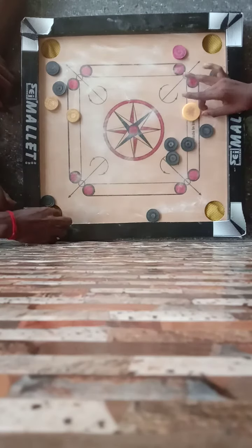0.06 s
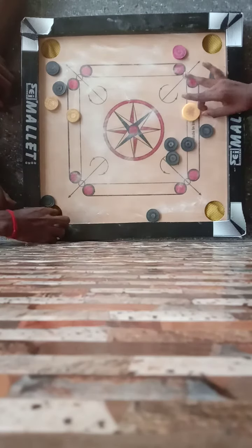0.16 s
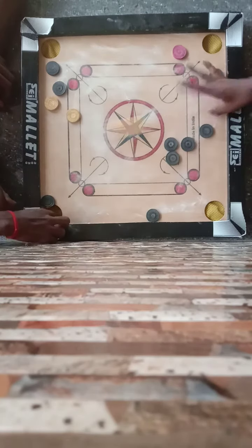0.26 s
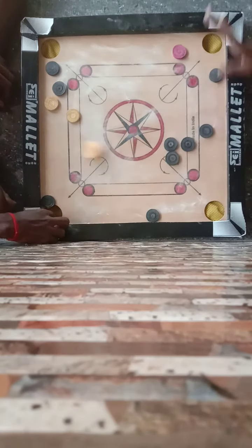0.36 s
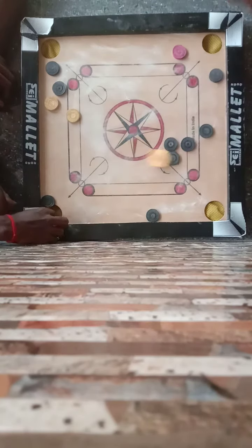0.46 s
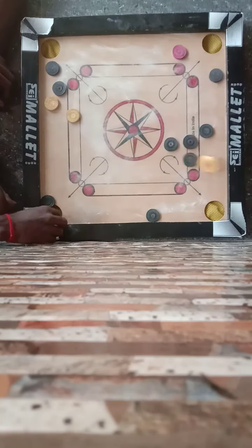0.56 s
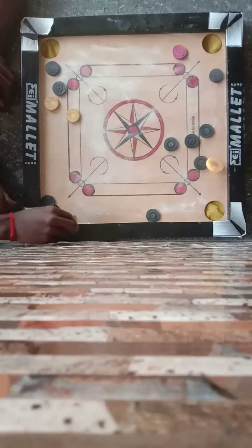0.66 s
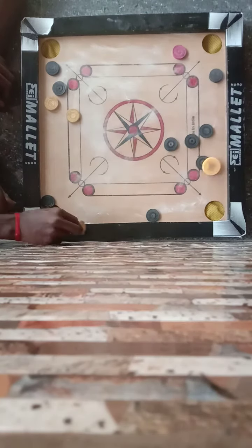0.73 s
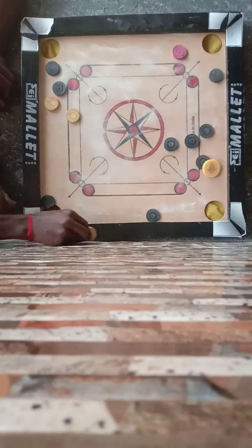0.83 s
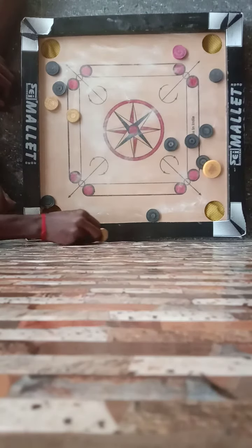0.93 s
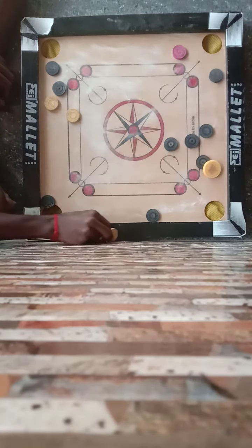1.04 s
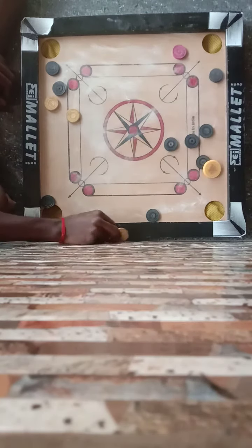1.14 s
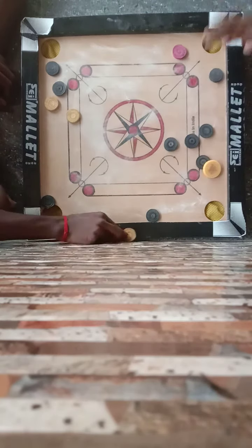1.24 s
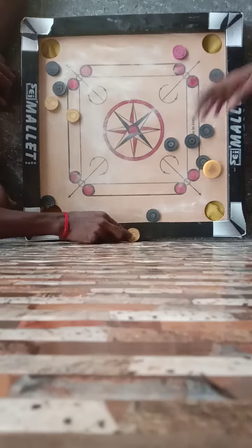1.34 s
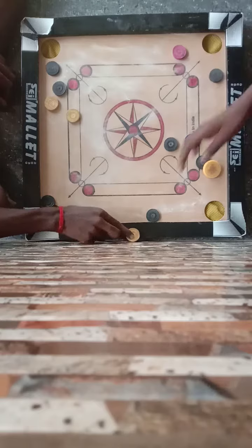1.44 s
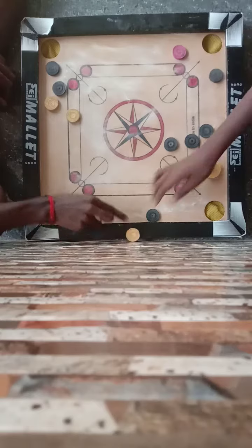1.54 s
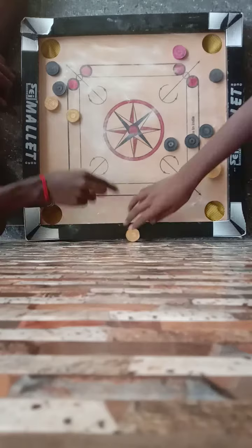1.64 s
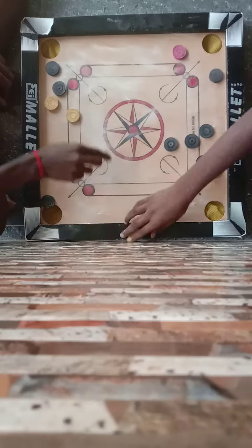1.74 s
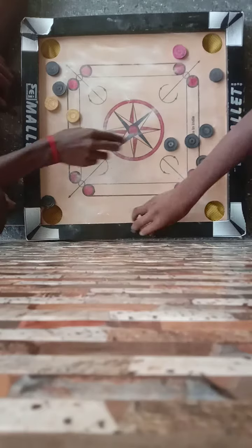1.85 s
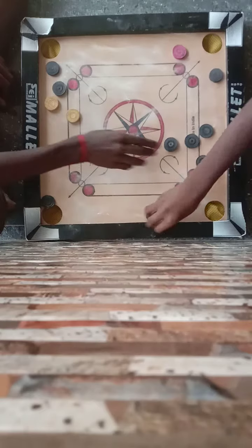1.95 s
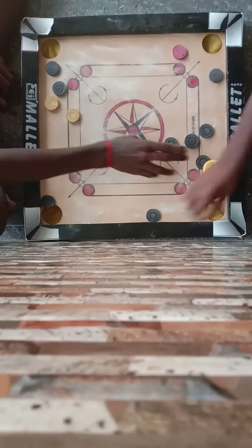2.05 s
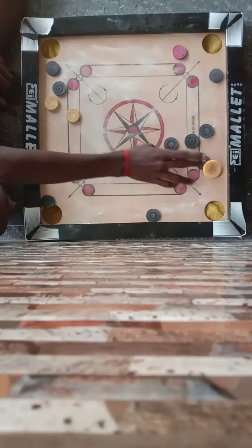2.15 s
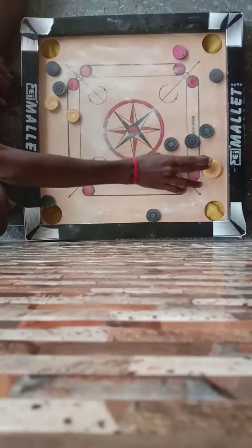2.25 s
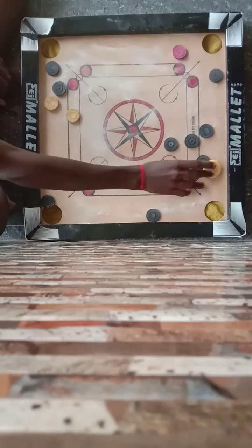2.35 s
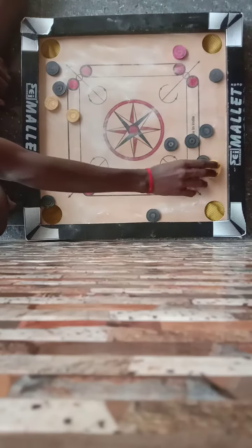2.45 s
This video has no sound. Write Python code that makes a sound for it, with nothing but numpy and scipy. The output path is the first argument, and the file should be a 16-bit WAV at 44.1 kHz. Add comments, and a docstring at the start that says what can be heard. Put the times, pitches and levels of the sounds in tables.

```python
"""A small hard room with a carrom board, heard by a phone, almost in mono. A striker and wooden discs clack
against each other and the frame: filtered noise for the contact, resonances for the dull ring of the thin board.
A wall answers 8 ms later and decaying noise stands for the diffuse room.
Soft low thumps are short decaying sines, and a hand brushing the board is grainy coloured noise.
Beneath lie a steady noise hush with a thin two-tone whine and an unsteady low rumble."""
import sys
import numpy as np
from scipy import signal
from scipy.fft import rfft, irfft, next_fast_len
from scipy.io import wavfile
from scipy.ndimage import uniform_filter1d

SR = 44100
rng = np.random.default_rng(int(sys.argv[2]) if len(sys.argv) > 2 else 0)


def wrap_up_sound(samples):
    """Save the sound to the file named by the first command line argument, as 16-bit audio."""
    columns = np.atleast_2d(samples).T
    # keep every value between -1 and 1, then stretch to whole-number steps
    tamed = np.clip(columns, -1, 1)
    steps = np.round(tamed * 32767).astype(np.int16)
    wavfile.write(sys.argv[1], SR, steps)


N = 110250  # samples, 2.5 s


def amp(db):
    """The decibel law: a level in dB as an amplitude gain."""
    return 10 ** (np.asarray(db) / 20)


def unit(x):
    """Power normalisation: x scaled to rms 1."""
    return x / np.sqrt(np.mean(x ** 2) + 1e-20)


def along(points, hz):
    """Interpolation on a logarithmic frequency axis through (Hz, value) points."""
    f, v = np.transpose(points)
    return np.interp(np.log(hz + 1), np.log(f + 1), v)


def curve(rows):
    """Linear interpolation in time through (s, value) rows, one value per sample."""
    s, v = np.transpose(rows)
    return np.interp(np.arange(N) / SR, s, v)


def filtered(x, response):
    """Linear filtering: the spectrum of x times a response that is a function of frequency."""
    m = next_fast_len(N + SR // 2)
    hz = np.fft.rfftfreq(m, 1 / SR)
    return irfft(rfft(x, m) * response(hz), m)[..., :N]


def rush(spectrum, patchy_db):
    """Turbulent-like noise of rms 1: random gain patches in time and frequency, then a spectral colour."""
    z = signal.stft(rng.standard_normal(N), nperseg=512)[2]
    across_bands = uniform_filter1d(rng.standard_normal(z.shape), size=5, axis=0)
    patches = unit(uniform_filter1d(across_bands, size=8, axis=1))
    x = signal.istft(z * amp(patchy_db * patches), nperseg=512)[1][:N]
    return unit(filtered(x, lambda hz: amp(along(spectrum, hz))))


# Level of the low rumble. Each row: time in seconds, rms level in dB.
RUMBLE_LEVEL = [(.01, -47), (.15, -54.5), (.3, -46), (.9, -45.5), (1.04, -44.5), (1.1, -51.5), (1.75, -50),
                (2.1, -50.5), (2.3, -47), (2.5, -52)]
# Colour of the low rumble. Each row: frequency in Hz, relative level in dB.
RUMBLE_COLOUR = [(25, -37), (135, -8), (167, -1), (296, -7), (328, -0.5), (380, -32), (840, -120)]


def rumble():
    """Amplitude modulation of low-frequency noise: the rumble comes and goes."""
    return amp(curve(RUMBLE_LEVEL)) * rush(RUMBLE_COLOUR, patchy_db=5.0)


# Colour of the steady room noise. Each row: frequency in Hz, relative level in dB.
HUSH_COLOUR = [(220, -62), (380, 1.5), (496, -9), (572, 3.5), (713, -0.5), (1250, 2.5), (1690, -9.5),
               (2180, -15), (3400, -21), (4220, -16.5), (6550, -27), (7550, -13), (9260, -39.5),
               (13800, -47), (14800, -35), (15450, -41), (15600, -72)]
# Tones of a faint electric whine. Each entry: frequency in Hz.
WHINE_HZ = [14919, 15119]
HUSH_DB, WHINE_DB = -48.5, -88  # rms of the noise; peak of each tone


def hush():
    """Superposition of stationary coloured noise, steady pure tones and the rumble."""
    t = np.arange(N) / SR
    whine = sum(np.sin(2 * np.pi * hz * t) for hz in WHINE_HZ)
    noise = rush(HUSH_COLOUR, patchy_db=0.8)
    return amp(HUSH_DB) * noise + amp(WHINE_DB) * whine + rumble()


# Level of the sliding hand. Each row: time in seconds, rms level in dB.
SLIDE_LEVEL = [(1.78, -74), (1.84, -59), (1.92, -50), (2.03, -50.5), (2.065, -43.5), (2.1, -53.5),
               (2.125, -47), (2.15, -51.5), (2.18, -47), (2.22, -56.5), (2.35, -66)]
# Colour of the sliding hand. Each row: frequency in Hz, relative level in dB.
SKIN_COLOUR = [(1060, -14), (1800, 1), (2290, -1.5), (7450, 3), (10800, -19.5), (11800, -28), (14000, -27),
               (15100, -14), (15700, -55)]
# Rustles on their own. Each row: time of the crest in seconds, level in dB.
RUSTLES = [(1.69, -62), (2.33, -60.5)]
SLIDE_PATCHY_DB = 3.2
GRAIN_DB, GRAINS_PER_S = 1.8, 250
RUSTLE_HZ, RUSTLE_WIDTH_HZ, RUSTLE_S = 4230, 800, 0.028  # widths: from the crest to 1/e


def brush():
    """Sliding friction: a hand on the powdered board gives fine random grains, and rustles twice on its own."""
    t = np.arange(N) / SR
    grain_db = GRAIN_DB * np.interp(t * GRAINS_PER_S, np.arange(N), rng.standard_normal(N))
    slide = unit(amp(grain_db) * rush(SKIN_COLOUR, SLIDE_PATCHY_DB))
    rustle = filtered(rng.standard_normal(N), lambda hz: np.exp(-((hz - RUSTLE_HZ) / RUSTLE_WIDTH_HZ) ** 2))
    swells = sum(amp(db) * np.exp(-((t - s) / RUSTLE_S) ** 2) for s, db in RUSTLES)
    return amp(curve(SLIDE_LEVEL)) * slide + swells * unit(rustle)


# Soft bumps. Each row: start in seconds, envelope peak in dB, pitch in Hz, time to fall 60 dB in seconds.
THUMPS = [(0.932, -41, 82, 0.045), (1.106, -45.5, 88, 0.075), (1.383, -24.5, 99.5, 0.05),
          (1.445, -34, 79, 0.087), (1.55, -29, 154, 0.046), (1.57, -33, 101, 0.072),
          (1.655, -29, 74.5, 0.045), (1.702, -36.5, 112, 0.066), (1.76, -23, 101.6, 0.074),
          (1.801, -31.5, 83, 0.058), (1.907, -40, 86.4, 0.1), (1.987, -41.5, 59.6, 0.26),
          (2.062, -34, 106, 0.067), (2.129, -41.5, 82, 0.097), (2.204, -41.5, 66.6, 0.08)]
THUMP_RISE_S = 0.0018


def thumps():
    """Heavily damped oscillation: each soft bump is a low sine lasting a few cycles."""
    out, t = np.zeros(N + SR), np.arange(SR // 4) / SR
    for start_s, db, hz, length_s in THUMPS:
        rise = (1 - np.exp(-t / THUMP_RISE_S)) ** 2
        shape = amp(-60 * (t / length_s) ** 2) * rise
        bump = amp(db) * shape / shape.max() * np.sin(2 * np.pi * hz * t)
        out[round(start_s * SR):][:len(t)] -= bump
    return out[:N]


# Reverberation. Each row: frequency in Hz, t60 of the early fall in seconds.
ROOM_T60 = [(300, 0.69), (800, 0.28), (2000, 0.38), (5500, 0.41), (14000, 0.31)]
BUILD_S, BEND_DB_PER_S2 = 0.0025, 490  # rise of the diffuse answer; its fall steepens
ECHO_S, ECHO_DB = 0.0082, 0  # near wall, over the direct sound
ECHO_ABOVE_HZ = 1060  # the wall returns mainly the upper ring
BASS_WET_DB = -8  # the room answers less below the upper ring
CONTACT_S = 0.0063  # t60 of a contact
TAP_DB = 4  # the rings sound drier than the clack


def room(size, direct_db):
    """Direct, reflected and diffuse sound: spectra of one blow, as a clean tap and as a gritty contact."""
    band_hz, frame_s, z = signal.stft(rng.standard_normal(size), SR, nperseg=128)
    fall_db = -60 * frame_s / along(ROOM_T60, band_hz)[:, None] - BEND_DB_PER_S2 * frame_s ** 2
    decay = signal.istft(z * amp(fall_db), SR, nperseg=128)[1][:size]

    t, hz = np.arange(size) / SR, np.fft.rfftfreq(size, 1 / SR)
    upper = 1 / (1 + (ECHO_ABOVE_HZ / (hz + 1)) ** 8)
    diffuse = rfft(decay * (1 - np.exp(-t / BUILD_S))) * amp(BASS_WET_DB * (1 - upper))
    # A delay is a phase that turns in proportion to frequency.
    wall = amp(ECHO_DB) * np.exp(-2j * np.pi * hz * ECHO_S) * upper

    contact = amp(direct_db - 60 * t / CONTACT_S)
    first, second = rfft(contact * rng.standard_normal((2, size)))
    tap = diffuse + amp(TAP_DB) * np.linalg.norm(contact) * (1 + wall)
    grit = diffuse + first + second * wall
    return tap, grit


MODE_SCATTER_DB = 2.5


def ringing(modes, hz):
    """Modal superposition: resonances of alternating sign, each struck a little differently."""
    total = 0
    for k, (centre, width, db) in enumerate(modes):
        gain = amp(db + MODE_SCATTER_DB * rng.standard_normal())
        resonance = 1j * hz * width / (centre ** 2 - hz ** 2 + 1j * hz * width)
        total = total + (-1) ** k * gain * resonance
    return total


def causal(spectrum, hz):
    """Minimum phase: folding the cepstrum makes a colour sound only after the blow."""
    cepstrum = irfft(np.log(amp(along(spectrum, hz)) + 1e-8))
    half = len(cepstrum) // 2
    return np.exp(rfft(np.r_[cepstrum[0], 2 * cepstrum[1:half], np.zeros(half)]))


BLOW_SIZE = 16384  # samples

# A disc's own ring. Each row: start in seconds, relative level in dB, frequency in Hz.
PINGS = [(0.269, -40, 4640), (0.4724, -35.5, 4615), (0.757, -36.5, 4450), (1.063, -54.5, 3920),
         (1.158, -33.5, 6140)]
PING_WIDTH_HZ, PING_DIRECT_DB = 270, 11  # width of one resonance; direct setting, before TAP_DB


def pings():
    """Free vibration of a struck disc: a resonance applied twice, heard through the room."""
    out, hz = np.zeros(N + BLOW_SIZE), np.fft.rfftfreq(BLOW_SIZE, 1 / SR)
    for start_s, db, ring_hz in PINGS:
        ring = ringing([(ring_hz, PING_WIDTH_HZ, 0)], hz) ** 2
        tap, _ = room(BLOW_SIZE, PING_DIRECT_DB)
        out[round(start_s * SR):][:BLOW_SIZE] += amp(db) * irfft(tap * ring) / np.abs(ring).std()
    return out[:N]


# Contacts. Each row: start in seconds, relative levels in dB of the upper, low and middle board rings,
# clack levels in dB at 2.5 kHz and at 9 kHz, direct sound over the diffuse in dB (before TAP_DB for the rings).
KNOCKS = [(0.232, -27, -50, -21.5, -33, -24, -1), (0.243, -29, -29.5, -58, -24.5, -20, 7),
          (0.267, -34, -31.5, -33, -27, -35, 15.5), (0.297, -20, -40, -18, -30, -23, -0.5),
          (.309, -28, -20, -18, -9, -7, 7), (0.362, -20.5, -50, -21, -15, -12.5, -29),
          (0.435, -17.5, -17, -22, -20, -23.5, 5.5), (0.4718, -20.5, -40, -18.5, -18.5, -23.5, 8),
          (0.531, -35.5, -38, -46, -31, -62, 14), (0.5677, -17.5, -25, -23, -24, -21.5, 5.5),
          (0.592, -21, -26, -11.5, -21, -45, 2), (.6235, -26, -30, -23, -18.5, -23, 11),
          (.654, -20.5, -38, -18.5, -17.5, -45, 6.5), (0.685, -36, -28.5, -23, -21, -67, 3),
          (0.7026, -25, -29, -23, -16, -10, 7), (0.732, -31, -42, -34.5, -43, -39, 20),
          (0.754, -24, -44, -30, -19.5, -21.5, 14.5), (.797, -23.5, -48, -31.5, -20.5, -28.5, 11),
          (.872, -55, -37.5, -42, -70, -70, 0), (1.064, -36.5, -43, -36, -31, -51, 6.5),
          (1.159, -29, -31, -24.5, -23.5, -6, 5.5), (1.351, -71, -41.5, -80, -75, -68, 8.5),
          (1.803, -40.5, -63, -44, -32, -32.5, -2), (1.852, -39, -30, -42, -70, -35, 7.5),
          (1.877, -52, -49, -49, -60, -60, 17.5), (2.021, -77, -34, -73, -69, -61, 12)]
# Board modes in three groups. Each row: frequency in Hz, width in Hz, relative level in dB.
LOW_RING = [(329, 18, -5), (422, 22, 3.5)]
MID_RING = [(572, 24, -8), (740, 20, -11), (810, 24, 0), (972, 22, -6)]
TOP_RING = [(1096.5, 94, 2.5), (1246.8, 52, 10.5), (1371, 15, 3.5), (1540, 160, -12.5)]
# Colour of the clack. Each row: frequency in Hz, relative level in dB.
CLACK_COLOUR = [(880, -16), (1500, 2.5), (2170, -1.5), (5230, -5), (5950, -2.5), (6570, -9), (7710, -4),
                (8520, -14.5), (11800, -31.5), (15500, -30), (16300, -88)]
LOW_HZ, HIGH_HZ = 2500, 9000  # where the two clack levels apply
SOFT_HZ = 3780  # the board rings dull above this
SWELL_HZ, SWELL_WIDTH_HZ = 400, 130  # the low ring swells through the hollow under the board


def knocks():
    """Impact excitation: every contact rings the board and cracks in the treble, in its own mixture."""
    out, hz = np.zeros(N + BLOW_SIZE), np.fft.rfftfreq(BLOW_SIZE, 1 / SR)
    soft = 1 / (1 + 1j * hz / SOFT_HZ) ** 4
    hollow = 1j * hz / (SWELL_HZ ** 2 - hz ** 2 + 1j * hz * SWELL_WIDTH_HZ)
    bodies = ((soft, TOP_RING), (hollow, LOW_RING), (soft, MID_RING))
    for start_s, *rings_db, low_db, high_db, direct_db in KNOCKS:
        tilt = [(LOW_HZ, low_db), (HIGH_HZ, high_db)]
        colour = [(f, db + along(tilt, f)) for f, db in CLACK_COLOUR]
        clack = causal([(200, -150)] + colour, hz)  # almost nothing below 200 Hz
        rings = [body * ringing(modes, hz) for body, modes in bodies]
        board = sum(amp(db) * ring / np.abs(ring).std() for ring, db in zip(rings, rings_db))
        tap, grit = room(BLOW_SIZE, direct_db)
        out[round(start_s * SR):][:BLOW_SIZE] += irfft(tap * board + grit * clack)
    return out[:N]


WIDE_DB = -30.5  # gain of the rumble that differs between the channels


def scene():
    """Mid-side superposition: all sources in the middle, with a faint low noise that differs between the
    channels."""
    mid = hush() + brush() + thumps() + pings() + knocks()
    side = amp(WIDE_DB) * rumble()
    return np.array([mid + side, mid - side])


TOP_HZ = 16460


def record(dry):
    """Band limitation: the phone keeps nothing above its upper limit."""
    return filtered(dry, lambda hz: hz < TOP_HZ)


dry = scene()
out = record(dry)
wrap_up_sound(out)
```